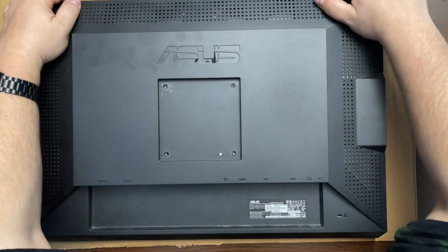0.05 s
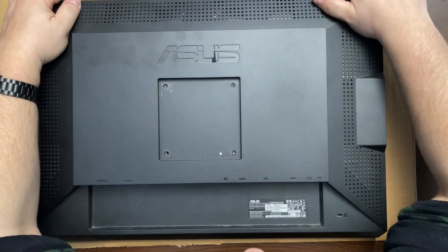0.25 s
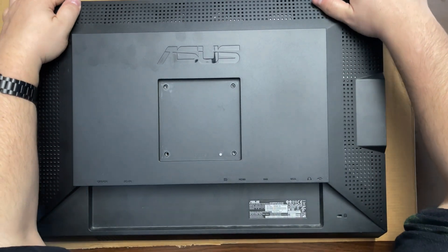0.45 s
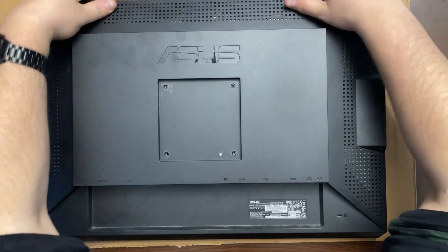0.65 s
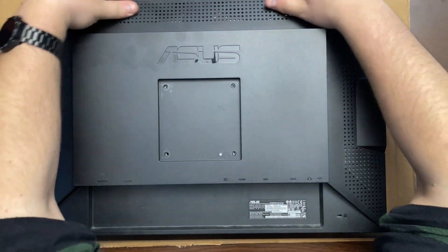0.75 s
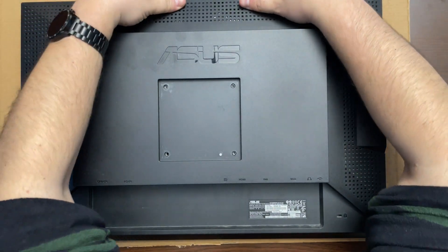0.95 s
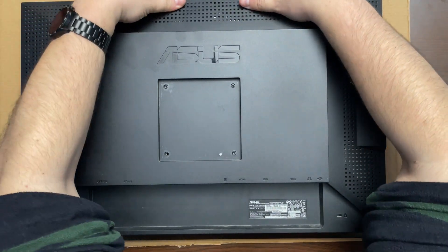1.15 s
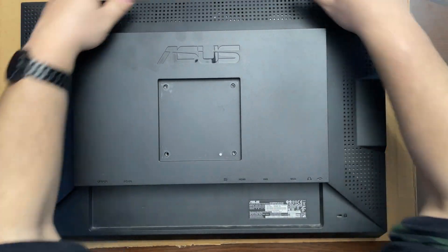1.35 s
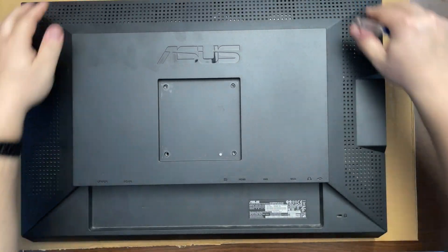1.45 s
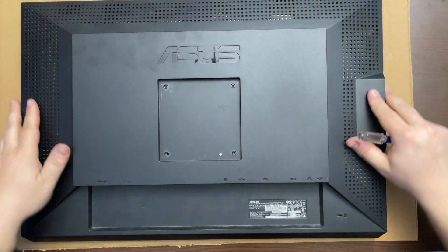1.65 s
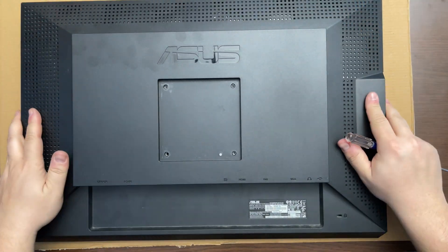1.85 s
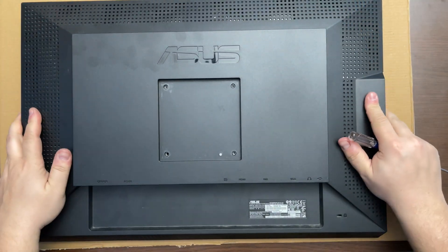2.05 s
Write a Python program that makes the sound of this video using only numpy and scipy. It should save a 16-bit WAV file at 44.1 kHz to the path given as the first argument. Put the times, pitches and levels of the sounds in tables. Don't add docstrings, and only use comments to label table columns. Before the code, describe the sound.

One hard plastic snap with a brief rattle, then soft hand brushing and small clicks.

```python
import sys
import numpy as np
from scipy import signal
from scipy.fft import rfft, irfft
from scipy.io import wavfile
from scipy.ndimage import uniform_filter1d

SR = 44100
rng = np.random.default_rng(int(sys.argv[2]) if len(sys.argv) > 2 else 0)


def ratio_of_db(decibels):
    return 10 ** (np.asarray(decibels, float) / 20)


def bounce(signal):
    frames = np.transpose(np.atleast_2d(signal))
    limited = np.clip(frames, -1, 1)
    pcm = np.round(limited * 32767).astype(np.int16)
    wavfile.write(sys.argv[1], SR, pcm)


N = 92610

# hz, level_db
AIR_SPECTRUM = [(12, -12), (20, -29), (55, -6.5), (208, -1), (730, -32), (1210, -5), (3030, -15.5),
                (7190, -18), (15700, -28)]
# start_s, fingertip_hiss_db, palm_drag_db, desk_load_db
HAND_MOVES = [(0, -49, -64, -67), (0.122, -58, -63.5, -65), (0.172, -77, -62, -61), (.44, -72, -68, -75),
              (.53, -57, -64, -71), (.62, -48.5, -60.5, -76), (.74, -51, -61.5, -67),
              (0.849, -38, -57.5, -71), (0.944, -43, -57.5, -66), (.99, -65, -61, -62.5),
              (1.068, -56, -59.5, -54), (1.22, -71, -63.5, -62), (1.40, -64, -65.5, -64),
              (1.57, -62, -69, -62), (1.84, -103, -66, -67.5), (1.93, -58, -64, -62),
              (2.03, -52.5, -60.5, -58.5), (2.1, -57.5, -59, -60)]
# start_s, rise_s, hold_s, fade_db_per_s, level_db
BRUSH_STROKES = [
    (1.250, 0.028, 0.053, 900, -45),
    (1, .005, 0.0098, 400, -63),
    (.572, 0.009, 0.057, 194, -56),
    (1.582, 0.008, 0.061, 80, -47),
    (1.739, 0.038, 0.0098, 305, -54.5),
    (0.663, 0.031, 0.08, 308, -52),
]
# hz, level_db
HISS_SPECTRUM = [(880, -10.5), (1500, -9), (2600, -12.5), (3490, -11.5), (4690, -12.5), (6550, -13),
                 (9610, -17), (14500, -2), (15700, -3.5)]
# hz, level_db
DRAG_SPECTRUM = [(88, -56), (150, -10.5), (324, -1.5), (700, -7.5), (767, -4), (1110, -8), (1350, -24.5),
                 (12000, -29), (15600, -63), (22000, -120)]
# peak_s, peak_db, centre_hz, width_octaves, decay_ms
LATCH_CRACKS = [(.1680, -32, 12000, 0.61, 3), (.1700, -29, 2900, 1.9, 3.2), (.1700, -33.5, 7500, .3, 2.8),
                (.178, -50, 14800, .12, 20), (.1720, -40.5, 3980, 3.9, 20.4), (.2050, -31.5, 2000, 1.7, 13),
                (.2050, -41, 6500, 0.35, 6.8), (.2130, -31, 9000, 1, 3.7), (.2140, -25, 13500, 0.39, 1.5),
                (.2155, -17, 13400, 0.19, 2.45), (.2190, -17.5, 14800, .2, 1.8),
                (.2170, -17.5, 7100, 0.42, 3.3), (.2175, -19, 3220, 0.44, 1.6),
                (.2190, -16.5, 1440, 1.46, 2.93), (.2280, -27, 2460, 4.3, 6.9),
                (.2280, -30.5, 790, 0.77, 8.6), (.2310, -28.5, 7060, 0.79, 2),
                (1.7895, -40.5, 1700, 0.98, 3.4), (1.790, -41.5, 11900, 0.073, 1.7),
                (1.789, -42, 15000, .1, 2), (1.790, -48, 6440, .1, 1.3)]
# pitch_hz, width_hz, level_db
SHELL_MODES = [(900, 250, -13), (1220, 145, -2), (3020, 130, -32), (3890, 180, 2), (5920, 610, 5),
               (7160, 330, 0), (11070, 1600, 1.5), (13100, 960, 10), (15000, 940, 2.5)]
# start_s, peak_db, pitch_hz,
# decay_ms
SHELL_KNOCKS = [(.1690, -32, 1100, 4), (.1692, -32, 1607, 3.9), (.170, -42, 2500, 2.8),
                (.1695, -34.5, 4110, 3), (.1780, -35.5, 900, 5.3), (.2045, -32, 1010, 3.5),
                (.2050, -39, 4000, 4), (.2170, -24, 1640, 2.3), (.2300, -32, 3050, 2.7),
                (.275, -41, 1250, 4), (0.18, -46.5, 253, 14), (.2175, -17.5, 1199, 2.8),
                (.2170, -24, 3800, 2.5), (.2185, -24.5, 588, 3.7), (0.218, -18, 2820, 1.9),
                (.221, -28, 239, 12.2), (.5125, -45, 850, 3), (.5135, -49.5, 2000, 2.6),
                (1.8, -46, 2250, 3), (0.51, -51.5, 239, 22), (1.0592, -45, 1190, 8.7),
                (1.0595, -41, 1980, 3.6), (1.291, -46, 213, 9.5), (1.9025, -33.5, 830, 4.2),
                (1.913, -39, 900, 4), (1.9199, -39, 940, 2.4), (1.877, -52, 2300, 3),
                (1.992, -34, 860, 1.3)]
# pitch_hz, level_db, t60_s
HOUSING_MODES = [(241.6, -5.5, 0.25), (319, -17, 0.2), (358, -2.5, 0.27), (540.4, -13, 0.21),
                 (647, -6, 0.16), (743, -7, 0.081), (813, -10, .08), (935, 0, 0.074), (973, -6.5, 0.31),
                 (1070, -11, 0.28), (1230, -14, 0.19), (1345, -21, 0.18)]
# hz, level_db
SNAP_TAIL_SPECTRUM = [(150, -17), (240, -5), (600, -7.5), (1200, -5), (3500, -8), (6000, -6), (9000, -9.5),
                      (11000, -14.5), (14800, -3.5), (15600, -5)]
# peak_s, peak_db, centre_hz, width_octaves, decay_ms
FINGER_TAPS = [(.447, -61, 14100, 0.13, 1.7), (0.473, -52.5, 2530, 0.59, 1.3), (.499, -52, 1520, .7, 1.5),
               (.5125, -53, 7200, 0.17, 2.4), (.5125, -51.5, 13600, 0.27, 2.4),
               (0.5129, -44, 900, 1.27, 3.9), (.513, -51, 2230, 0.47, 2.6), (1.054, -60.5, 8660, 0.07, 42),
               (1.041, -49, 9000, 1.3, 1.7), (1.0485, -44.5, 2180, 1.1, 7.9),
               (1.0598, -55, 2280, 0.35, 1.5), (1.060, -45.5, 4600, 0.17, 3.8),
               (1.2932, -37.5, 660, 1.2, 2.3), (1.213, -56, 1750, 3.6, 29), (1.299, -45, 595, 0.56, 6.4),
               (1.262, -54, 7000, 0.68, 5), (1.588, -50, 14600, .1, 45), (1.873, -58, 7250, .06, 2.2),
               (1.8748, -43, 3900, 0.43, .7), (1.877, -54, 5200, .1, 3), (1.9031, -30.5, 1250, 0.68, 2),
               (1.903, -37.5, 2480, 1.2, 5), (1.904, -42.5, 7160, 0.92, 3.2), (1.910, -44.5, 1000, 1, 31),
               (1.956, -49, 7500, 0.08, 2.4), (1.957, -54, 6200, 0.053, 2.2), (1.993, -42, 1680, 0.57, 4.2),
               (2.011, -44.5, 487, 0.5, 4.5)]
# time_s, pitch_hz, level_db
SQUEAK_GLIDE = [
    (0.829, 277.7, -64),
    (.86, 288.7, -60),
    (0.888, 268, -55),
    (.925, 268, -86),
]
# hz, t60_s
ROOM_DECAY = [(100, 0.54), (2000, 0.36), (6000, 0.53), (15000, 0.19)]
# hz, level_db
MIC_COLOUR = [(4000, 2), (5200, -2.5), (6200, 2), (6700, 3), (7300, 6), (8200, 3.5), (9000, 6.5),
              (9700, 1.5), (12600, -0.5), (13500, 0), (14100, -0.5), (14800, 2.5), (15400, 1)]


def evened(x):
    return x / np.sqrt(np.mean(x ** 2) + 1e-20)


def read(points, hz):
    f, value = np.transpose(points)
    return np.interp(np.log(hz + 1), np.log(f + 1), value)


def coloured(x, points):
    hz = np.fft.rfftfreq(len(x), 1 / SR)
    below = np.minimum(hz / points[0][0], 1) ** 2
    return irfft(rfft(x) * ratio_of_db(read(points, hz)) * below, len(x))


def wobble(ms):
    size = max(int(ms * SR / 1000), 1)
    once = uniform_filter1d(rng.standard_normal(N), size)
    return evened(uniform_filter1d(once, size))


def patchy(x):
    patch_db = 2.2
    z = signal.stft(x, nperseg=256)[2]
    field = uniform_filter1d(rng.standard_normal(z.shape[::-1]), size=9, axis=0)
    field = evened(uniform_filter1d(field, size=5, axis=1))
    return signal.istft(z * ratio_of_db(patch_db * field.T), nperseg=256)[1][:len(x)]


def add(mix, s, sound):
    part = mix[round(s * SR):][:len(sound)]
    part += sound[:len(part)]


def still_air():
    level_db = -65 + 1.7 * wobble(23)
    return ratio_of_db(level_db) * evened(coloured(rng.standard_normal(N), AIR_SPECTRUM))


def hands():
    grains_per_s, grain_spread_db = 30000, 0.8
    brush_drag_db = -26.5
    t = np.arange(N) / SR
    s, hiss_db, drag_db, load_db = np.transpose(HAND_MOVES)

    brush = np.zeros(N)
    for start, rise, hold, fade, db in BRUSH_STROKES:
        fading_db = db - fade * np.maximum(t - start - rise - hold, 0)
        brush += ratio_of_db(fading_db) * np.clip((t - start) / rise, 0, 1)

    grain_level = ratio_of_db(grain_spread_db * rng.exponential(1, N))
    grain_hits = rng.random(N) < grains_per_s / SR
    grit = grain_level * grain_hits * rng.standard_normal(N)
    hiss = evened(patchy(coloured(grit, HISS_SPECTRUM))) * ratio_of_db(0.9 * wobble(3))
    drag = evened(coloured(rng.standard_normal(N), DRAG_SPECTRUM)) * ratio_of_db(1.3 * wobble(6))
    desk_spectrum = [(28, 4.5), (80, -1.0), (160, -13), (400, -36), (1000, -69)]  # hz, level_db
    rumble = evened(coloured(rng.standard_normal(N), desk_spectrum))

    hiss *= ratio_of_db(np.interp(t, s, hiss_db)) + brush
    drag *= ratio_of_db(np.interp(t, s, drag_db)) + ratio_of_db(brush_drag_db) * brush
    rumble *= ratio_of_db(np.interp(t, s, load_db) + 1.5 * wobble(24))
    return hiss + drag + rumble


def bursts(rows, rise_ms):
    t, out = np.arange(4096) / SR, np.zeros(N)
    ms = t * 1000
    hz = np.fft.rfftfreq(4096, 1 / SR) + 1
    for s, db, centre_hz, octaves, decay_ms in rows:
        pink = rfft(rng.standard_normal(4096)) / np.sqrt(hz)
        bell = np.exp(-.5 * (np.log2(hz / centre_hz) / octaves) ** 2)
        rise = np.minimum(ms / rise_ms, 1) ** 2
        decay = np.exp(-(np.maximum(ms - rise_ms, 0) / decay_ms / 1.21) ** 1.1)
        add(out, s - rise_ms / 1000, .5 * ratio_of_db(db) * evened(irfft(pink * bell)) * rise * decay)
    return out


def shell(x):
    t = np.arange(2048) / SR
    ring = np.zeros(2048)
    for hz, width_hz, db in SHELL_MODES:
        decay = np.exp(-np.pi * max(width_hz, 250) * t)
        ring += ratio_of_db(db) * 2 * np.pi * width_hz / SR * decay * np.cos(2 * np.pi * hz * t)
    return 0.65 * x + signal.oaconvolve(x, ring)[:N]


def latch_cracks():
    return shell(bursts(LATCH_CRACKS, rise_ms=2.2))


def knocks():
    t, out = np.arange(4096) / SR, np.zeros(N)
    for s, db, hz, decay_ms in SHELL_KNOCKS:
        envelope = np.minimum(t / 0.00028, 1) * np.exp(-t * 1000 / decay_ms)
        add(out, s, ratio_of_db(db) * np.sin(2 * np.pi * hz * t) * envelope)
    return out * ratio_of_db(0.7 * wobble(2.5))


def housing():
    push_s, push_hz, push_db, push_ms = .2125, 84, -26.5, 8.3
    snap_s, modes_db = .2165, -34.5
    boom_hz, boom_db, boom_t60_s = 33, -37.5, 0.25
    snap_tail_db, snap_tail_t60_s, snap_tail_rise_s = -29, 0.35, 0.0088
    t, out = np.arange(SR // 2) / SR, np.zeros(N)

    push = ratio_of_db(push_db) * np.sin(2 * np.pi * push_hz * t)
    push *= np.exp(-(t * 1000 / push_ms) ** 2 / 2) * np.minimum(t / .003, 1)

    modes = np.zeros(len(t))
    for hz, db, t60 in HOUSING_MODES:
        level_db = db - 60 * t / min(t60, .25) + 4.4 * wobble(12)[:len(t)]
        modes += ratio_of_db(level_db) * np.sin(2 * np.pi * hz * t)
    modes *= ratio_of_db(modes_db) * np.minimum(t / 0.013, 1)

    boom = ratio_of_db(boom_db - 60 * t / boom_t60_s) * np.sin(2 * np.pi * boom_hz * t)

    snap_tail = evened(patchy(coloured(rng.standard_normal(len(t)), SNAP_TAIL_SPECTRUM)))
    snap_tail *= ratio_of_db(1.5 * wobble(0.62)[:len(t)])
    snap_tail *= ratio_of_db(snap_tail_db - 60 * t / snap_tail_t60_s) * np.minimum(t / snap_tail_rise_s, 1) ** 2

    add(out, push_s, push)
    add(out, snap_s, modes + boom + snap_tail)
    return out


def taps():
    return shell(bursts(FINGER_TAPS, rise_ms=0.74))


def squeak():
    s, hz, db = np.transpose(SQUEAK_GLIDE)
    t = np.arange(N) / SR
    pitch_hz = np.interp(t, s, hz) * (1 + 0.029 * wobble(3.2))
    phase = 2 * np.pi * np.cumsum(pitch_hz) / SR
    level_db = np.interp(t, s, db, -120, -120) + 3 * wobble(4)
    second_partial_db = 3
    return ratio_of_db(level_db) * (np.sin(phase) + ratio_of_db(second_partial_db) * np.sin(2 * phase))


def room(x):
    level_db, gap_s = -12, 0.0029
    echo = np.zeros(SR // 2)
    at = np.arange(0, SR // 2 - 20, 12)
    echo[at + rng.integers(0, 12, len(at))] = rng.choice([-1., 1.], len(at))
    hz, t, z = signal.stft(echo, SR, nperseg=256)
    decay = ratio_of_db(-60 * t / read(ROOM_DECAY, hz)[:, None])
    tail = signal.istft(z * decay, SR, nperseg=256)[1]
    tail *= np.clip(np.arange(len(tail)) / SR / gap_s, 0, 1) ** 2
    return ratio_of_db(level_db) * signal.fftconvolve(x, tail / np.linalg.norm(tail))[:N]


def scene():
    crack_send_db = -9
    air = still_air()
    cracks = latch_cracks()
    near = hands() + knocks() + taps() + squeak()
    echoes = room(near + ratio_of_db(crack_send_db) * cracks)
    return (cracks + near + echoes + housing() + air)[None]


def band_limit(x):
    return signal.sosfilt(signal.butter(12, 16810, fs=SR, output="sos"), x)


def record(dry):
    limit = .7
    edge_hz, skirt_hz, shelf_db = 15800, 45, 53
    hz = np.fft.rfftfreq(N, 1 / SR)
    edge = 1 / (1 + np.exp(np.clip((edge_hz - hz) / skirt_hz, -50, 50)))
    gain = ratio_of_db(read(MIC_COLOUR, hz) - shelf_db * edge)
    overloaded = limit * np.tanh(dry / limit)
    return band_limit(irfft(rfft(overloaded) * gain, N))


dry = scene()
out = record(dry)
bounce(out)
```